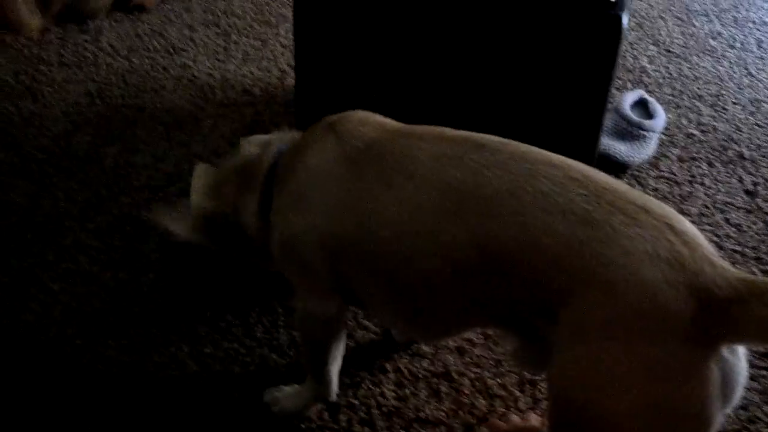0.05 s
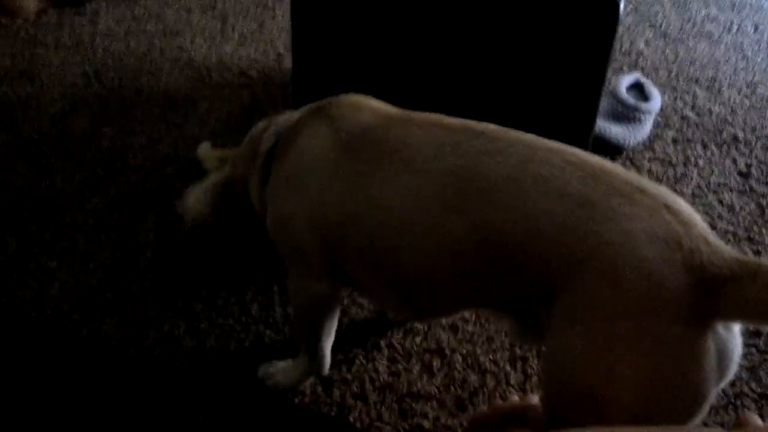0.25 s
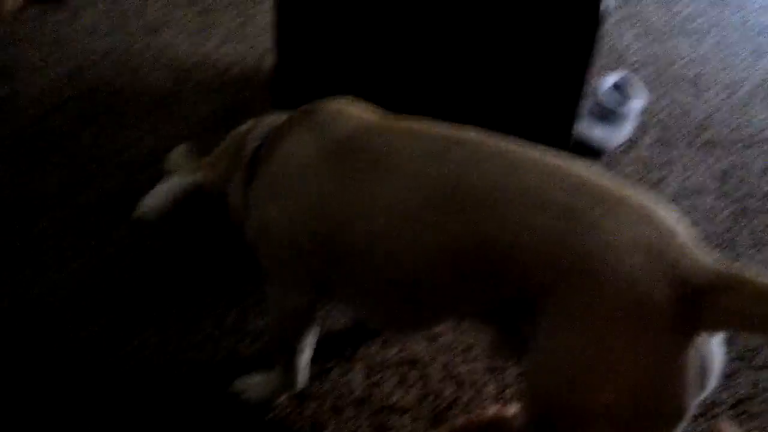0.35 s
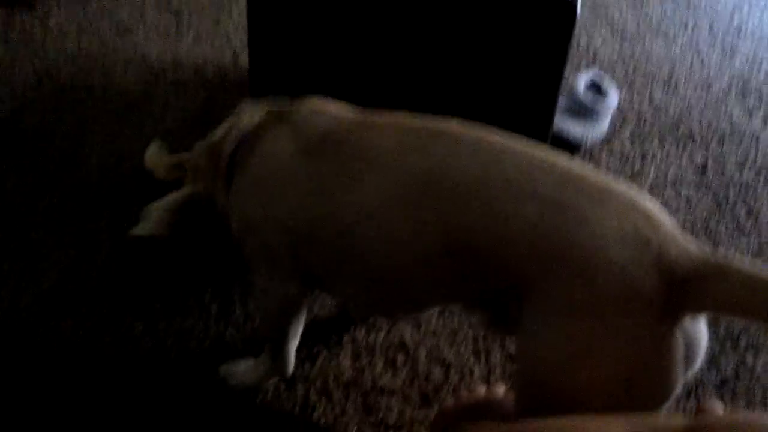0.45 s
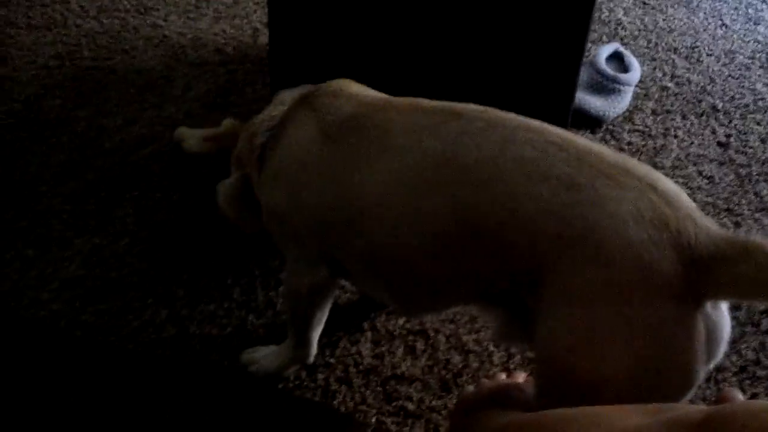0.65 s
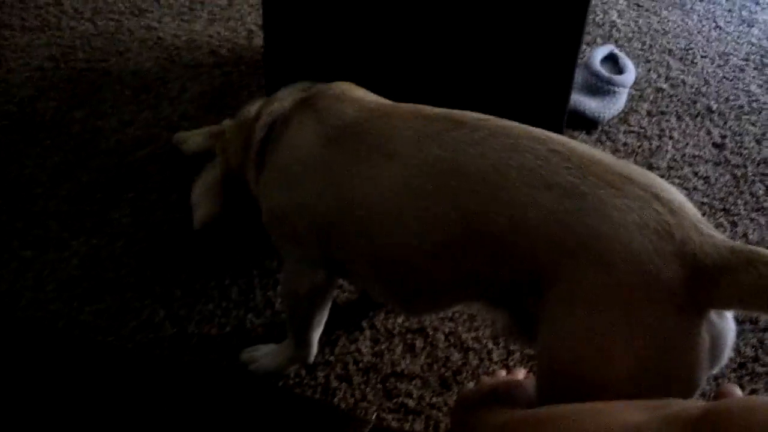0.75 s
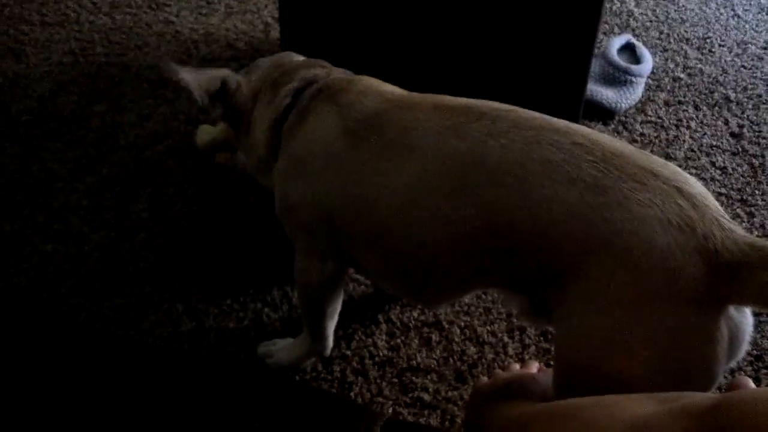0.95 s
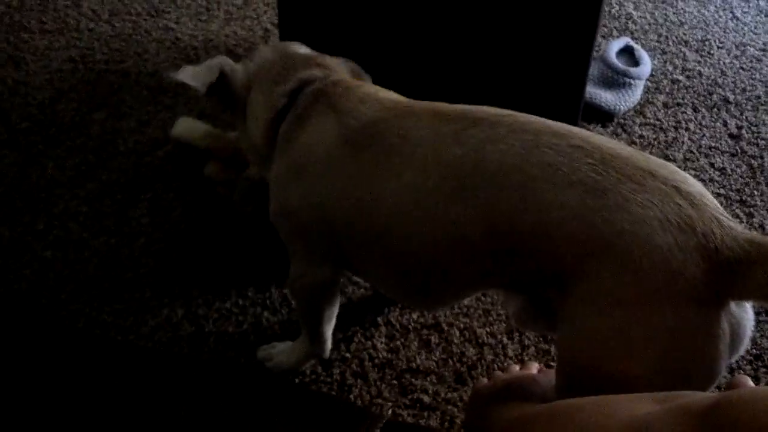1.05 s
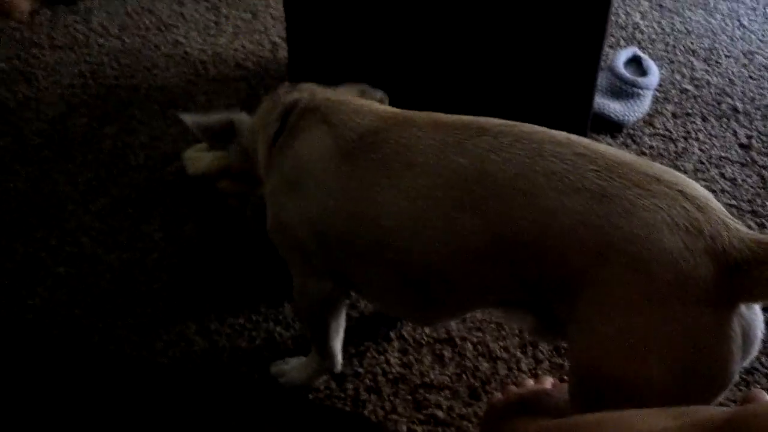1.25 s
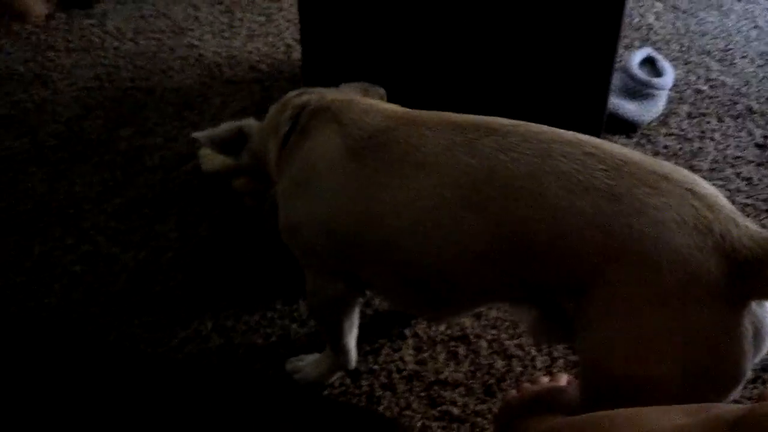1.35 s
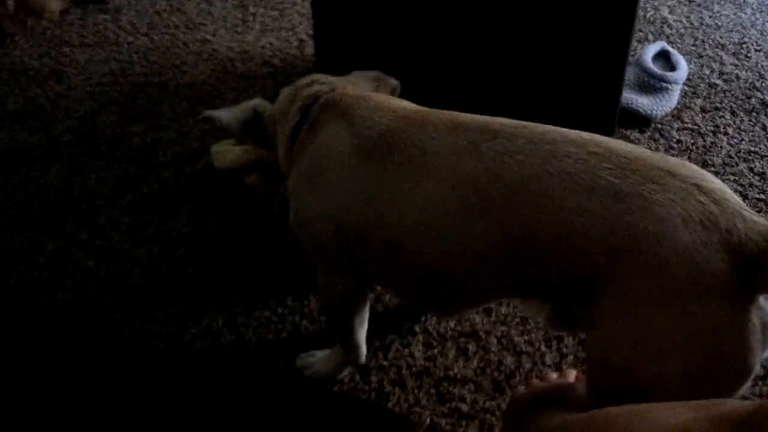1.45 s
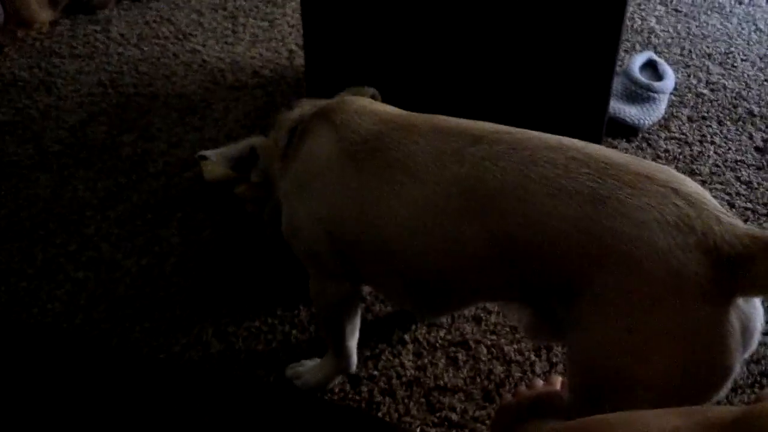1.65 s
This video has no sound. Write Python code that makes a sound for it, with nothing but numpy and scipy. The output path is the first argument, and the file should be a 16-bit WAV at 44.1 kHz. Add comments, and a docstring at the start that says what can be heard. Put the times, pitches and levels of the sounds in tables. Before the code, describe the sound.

Three short, piercing toy squeaks as a dog bites, over faint low room hum and hiss

```python
"""A dog bites a squeaky plush toy three times, left of two small microphones in a quiet carpeted room.
The squeaker's reed sings with the air pressure: gliding overtones and a hiss pulsed on every cycle.
Around it are gliding sine whistles, toneless hisses of leaking air and short ringing tooth ticks.
Echoes and a diffuse tail give the room, shaped noise and faint steady tones its background.
The recorder widens the stereo with delayed crossed copies and turns its gain down after loud sounds."""
import sys
import numpy as np
from scipy import signal
from scipy.fft import rfft, irfft
from scipy.io import wavfile
from scipy.ndimage import uniform_filter1d

SR = 44100
rng = np.random.default_rng(int(sys.argv[2]) if len(sys.argv) > 2 else 0)


def nominal_scale(level):
    """Amplitude ratio for a level in decibels (scalar or array-like)."""
    x = np.asarray(level, float) / 20
    return 10 ** x


def put_to_file(sound):
    """Save the sound as 16-bit audio at rate SR, in the file named by the first command-line argument."""
    columns = np.atleast_2d(sound).T  # one column per channel
    safe = np.clip(columns, -1, 1)
    whole_steps = np.round(safe * 32767)
    wavfile.write(sys.argv[1], SR, whole_steps.astype(np.int16))


N = 74970  # samples, 1.7 s

# Room tone and microphone hiss. Each row: frequency in Hz, relative level in dB per Hz.
FLOOR_COLOUR = [(40, -26.5), (70, -2), (120, 7), (180, 6.5), (300, -11), (600, -10), (1000, -23.5),
                (1330, -17.5), (2000, -24.5), (4000, -27.5), (8000, -39), (10500, -38.5), (13000, -37),
                (15000, -35.5)]
FLOOR_DB, FLOOR_FLICKER_DB = -51, 1
# How alike the floor and the room tail are at both microphones. Each row: frequency in Hz, likeness from 0 to 1.
MIC_LIKENESS = [(50, 0.88), (120, 1), (300, .75), (800, .6), (1500, .1), (4000, .02)]
# Faint steady tones in the room. Each row: frequency in Hz, middle level in dB at the left microphone.
HUM_TONES = [(120, -57), (180, -60), (595, -78.5), (1325, -76)]
# Teeth ticking on the toy. Each row: start in seconds, level in dB, ring frequency in Hz.
TOOTH_TICKS = [(0.116, -59.5, 6300), (0.127, -61.5, 5800)]
TICK_T60_S = .012
# Toneless air leaks, before the toy's colour. Each row: start in seconds, length in seconds, level in dB.
AIR_LEAKS = [(.185, .03, -71.5), (1.6, 0.041, -64.5)]
# Reed path, one list per squeak. Each row: time in seconds, pitch in Hz, level in dB before the toy's colour.
REED_SQUEAKS = [
    [(.2116, 854, -22), (.2132, 1344, -19.5), (.22, 1394, -29), (.232, 1418, -24.5), (.25, 1509, -22.5),
     (.265, 1582, -17.5), (.28, 1661, -29), (.292, 1676, -16), (.304, 1640, -26), (.316, 1532, -22.5),
     (.33, 1315, -26.5), (.35, 983, -39), (.36, 874, -41.5)],
    [(.6398, 1110, -40), (.6415, 1366, -22), (.653, 1482, -19.5), (.662, 1658, -14.5), (.671, 1838, -18.5),
     (.68, 1985, -8.5), (.684, 2168, -20.5), (.688, 2620, -8.5), (.692, 2740, -23), (.695, 3510, -33),
     (.697, 4285, -11.5), (.705, 4540, -12.5), (.709, 5430, -18.5), (.712, 5800, -41.5)],
    [(.8362, 4994, -53), (.838, 4512, -11.5), (.8405, 3567, -21), (.8435, 3181, -15), (.8455, 2233, -12),
     (.849, 1852, -16), (.855, 1589, -21.5), (.858, 1324, -24.5), (.863, 926, -34)],
]
# Slope of the overtones. One value per squeak: dB per octave.
OVERTONE_SLOPES = [-2, -3.5, -2]
OVERTONE_TWIST = .7  # radians; staggers the overtones so that a cycle is no sharp spike
# the hiss and the overtones above DULL_ABOVE_HZ start dull and come up as the reed settles
DULL_START_DB, DULL_ABOVE_HZ, SETTLE_S = 9.5, 7600, 0.032
REED_JITTER, REED_FLUTTER_DB, REED_HISS_DB = .003, 3, -20  # pitch share, level flutter, air under the tone
# Pure whistles, during the first squeak and after the second, one list per whistle.
# Each row: time in seconds, pitch in Hz, level in dB before the toy's colour.
WHISTLE_GLIDES = [
    [(.258, 1535, -40), (.27, 1772, -22), (.29, 1895, -23), (.303, 1707, -24), (.31, 1710, -44)],
    [(.71, 614, -46.5), (.725, 605, -35.5), (.76, 535, -40), (.81, 573, -49), (.83, 540, -52.5)],
]
# Colour of squeaker and plush. Each row: frequency in Hz, gain in dB.
TOY_COLOUR = [(500, -16), (900, -5.5), (1200, -7), (1700, -6.5), (2200, -4), (2700, -3.5), (3200, 0.5),
              (4500, -3), (5500, 0), (8000, -4.5), (9500, -6.5), (12000, -8), (14300, -7.5), (15300, -3.5)]
TUBE_HZ, TUBE_WIDTH_HZ, TUBE_DB = 6700, 1100, 6.5  # resonance of the squeaker's tube
# Right microphone against left, as the toy is on the left. Each row: frequency in Hz, gain in dB.
RIGHT_SHADOW = [(500, -6), (2200, 1), (3500, -7.5), (6000, -19), (12000, -16.5)]
RIGHT_LAG_S = .00009  # about 3 cm further for the sound to travel
# Strong echoes. Each row: delay in seconds, left level in dB, right level in dB.
ROOM_ECHOES = [(.006, -18.5, -12), (.011, -18.5, -6.5), (.021, -11, -17)]
# Decay of the room tail. Each row: frequency in Hz, time to fall 60 dB in seconds.
TAIL_T60 = [(500, .4), (1500, 0.39), (4000, .33), (8000, 0.38), (15000, .22)]
TAIL_DB, TAIL_BUILD_S = -8, .008
CROSS_SAMPLES, CROSS_SHARE = 16, 1  # delay and share of the opposite channel
GAIN_FROM_DB, GAIN_SHARE = -41, 0.48  # threshold, dB of cut per dB above it
GAIN_ATTACK_S, GAIN_RELEASE_DB_PER_S = 0.078, 22.5
TOP_HZ = 15750  # top of the reed's overtones and of the recorder


def rms_one(x):
    """Scales a signal to an rms of 1."""
    return x / np.sqrt(np.mean(x ** 2) + 1e-20)


def at_hz(points, hz):
    """Reads a table between its rows, along log frequency."""
    table = np.array(points)
    return np.interp(np.log(np.maximum(hz, 1)), np.log(table[:, 0]), table[:, 1])


def drift(rate):
    """Random wander of rms 1: white noise through two equal low-pass poles at rate in Hz."""
    r = np.exp(-2 * np.pi * rate / SR)
    wander = signal.lfilter([1], [1, -2 * r, r * r], rng.standard_normal(N + SR))
    return rms_one(wander[SR:])  # the first second is run-in


def bands(step):
    """Neighbouring noise bands, step octaves wide: centre in Hz and a pair of unrelated draws."""
    edges = 36 * 2 ** np.arange(0, 9.1, step)
    white = rng.standard_normal((2, 2, N))
    for k, (low, high) in enumerate(zip(edges, edges[1:])):
        sos = signal.butter(2, [low, high], "band", fs=SR, output="sos")
        yield np.sqrt(low * high), signal.sosfilt(sos, white[k % 2])


def paired(hz, noise):
    """Mixes a shared and an opposed noise to the likeness of the two microphones."""
    alike = np.clip(at_hz(MIC_LIKENESS, hz), 0, 1)
    shared = np.sqrt((1 + alike) / 2) * noise[0]
    opposed = np.sqrt((1 - alike) / 2) * noise[1]
    return shared + opposed * [[1], [-1]]


def floor():
    """Room tone and hiss from flickering noise bands, and hum from sines of wandering level."""
    t = np.arange(N) / SR
    tone = sum(paired(hz, noise) * nominal_scale(at_hz(FLOOR_COLOUR, hz) + FLOOR_FLICKER_DB * drift(12))
               for hz, noise in bands(1 / 3))
    hum = sum(nominal_scale(db + 5.4 * drift(8)) * np.sin(2 * np.pi * hz * t) for hz, db in HUM_TONES)
    return nominal_scale(FLOOR_DB) * rms_one(tone) + hum * [[1], [.7]]


def ticks():
    """Teeth on the toy set off short bright rings: sines that decay exponentially."""
    t = np.arange(N) / SR
    out = np.zeros(N)
    for s, db, hz in TOOTH_TICKS:
        decay = nominal_scale(db - 60 * np.abs(t - s) / TICK_T60_S) * (t > s)
        out += decay * np.sin(2 * np.pi * hz * (t - s))
    return out


def leaks():
    """Air slipping through the squeaker without a tone: white hiss that swells and fades."""
    t = np.arange(N) / SR
    swell = sum(nominal_scale(db) * np.sin(np.pi * np.clip((t - s) / length, 0, 1)) ** .5
                for s, length, db in AIR_LEAKS)
    return swell * rng.standard_normal(N)


def squeaks():
    """The reed chops the air: a stack of overtones and a hiss pulsed on every cycle."""
    out, t = np.zeros(N), np.arange(N) / SR
    jitter, flutter, hiss = drift(150), drift(90), rng.standard_normal(N)
    k = np.arange(1, 18)[:, None]  # overtone numbers
    for rows, slope_db in zip(REED_SQUEAKS, OVERTONE_SLOPES):
        s, hz, db = np.transpose(rows)
        on = (t >= s[0]) & (t < s[-1])
        pitch = np.interp(t[on], s, hz) * (1 + REED_JITTER * jitter[on])
        phase = 2 * np.pi * np.cumsum(pitch) / SR
        dull_db = DULL_START_DB * np.exp(-(t[on] - s[0]) / SETTLE_S)
        overtone_db = slope_db * np.log2(k) - dull_db * (k * pitch > DULL_ABOVE_HZ)
        overtones = nominal_scale(overtone_db) * np.sin(k * phase + OVERTONE_TWIST * k * k)
        tone = (overtones * (k * pitch < TOP_HZ)).sum(0)
        air = nominal_scale(REED_HISS_DB - dull_db) * hiss[on] * (1 + np.cos(phase))
        out[on] = (tone + air) * nominal_scale(np.interp(t[on], s, db) + REED_FLUTTER_DB * flutter[on])
    return out


def whistles():
    """Gliding sines without overtones, their phase summed from the pitch."""
    out, t = np.zeros(N), np.arange(N) / SR
    for rows in WHISTLE_GLIDES:
        s, hz, db = np.transpose(rows)
        on = (t >= s[0]) & (t < s[-1])
        phase = 2 * np.pi * np.cumsum(np.interp(t[on], s, hz)) / SR
        out[on] = nominal_scale(np.interp(t[on], s, db)) * np.sin(phase)
    return out


def resonance(x, hz, width_hz):
    """A ringing air column as a two-pole band-pass, with a gain of about 1 at its peak."""
    r = np.exp(-np.pi * width_hz / SR)
    poles = [1, -2 * r * np.cos(2 * np.pi * hz / SR), r * r]
    return signal.lfilter(np.array([1, 0, -1]) * (1 - r * r) / 2, poles, x)


def coloured(x, points, lag_s=0):
    """Gain by frequency with the phase that lets nothing sound early (minimum phase), and a lag."""
    hz = np.arange(N // 2 + 1) * SR / N
    cepstrum = irfft(np.log(nominal_scale(at_hz(points, hz))), N)
    cepstrum[1:N // 2] *= 2  # fold the late half onto the early half
    cepstrum[N // 2 + 1:] = 0
    return irfft(rfft(x) * np.exp(rfft(cepstrum) - 2j * np.pi * hz * lag_s), N)


def room(x):
    """A few strong echoes and a diffuse tail that builds up, then dies band by band."""
    t = np.arange(SR // 2) / SR
    tail = sum(paired(hz, noise)[:, :len(t)] * nominal_scale(-60 * t / at_hz(TAIL_T60, hz))
               for hz, noise in bands(1) if hz > 300)
    tail = tail * (1 - np.exp(-t / TAIL_BUILD_S))
    tail = nominal_scale(TAIL_DB) * tail / np.sqrt((tail ** 2).sum(1, keepdims=True))
    echoes = np.zeros_like(tail)
    for delay, left_db, right_db in ROOM_ECHOES:
        echoes[:, int(delay * SR)] = nominal_scale([left_db, right_db])
    return signal.fftconvolve(x[None], tail + echoes, axes=1)[:, :N]


def scene():
    """The toy direct at the left and right microphones, its echoes and tail, and the room's floor."""
    air = squeaks() + whistles() + leaks()
    tube = nominal_scale(TUBE_DB) * resonance(air, TUBE_HZ, TUBE_WIDTH_HZ)
    toy = coloured(air + tube, TOY_COLOUR) + ticks()
    direct = np.array([toy, coloured(toy, RIGHT_SHADOW, RIGHT_LAG_S)])
    return direct + room(toy) + floor()


def band_limit(x):
    """A steep low-pass at the top of the band."""
    return signal.sosfilt(signal.butter(12, 16610, fs=SR, output="sos"), x)


def record(dry):
    """The recorder: gain that drops after loud sounds, stereo widening and a steep top cut."""
    fall = GAIN_RELEASE_DB_PER_S * np.arange(N) / SR
    level_db = 10 * np.log10(uniform_filter1d((dry ** 2).mean(0), size=441) + 1e-12)  # over 10 ms
    held_db = np.maximum.accumulate(level_db + fall) - fall  # peaks that sink at the release rate
    over_db = np.maximum(held_db - GAIN_FROM_DB, 0)
    r = np.exp(-1 / (GAIN_ATTACK_S * SR))
    levelled = dry * nominal_scale(-GAIN_SHARE * signal.lfilter([1 - r], [1, -r], over_db))
    crossed = np.pad(levelled[::-1], ((0, 0), (CROSS_SAMPLES, 0)))[:, :N]
    wide = levelled - CROSS_SHARE * crossed
    top_cut = signal.ellip(10, 1, 50, TOP_HZ, fs=SR, output="sos")
    return band_limit(signal.sosfilt(top_cut, wide))


dry = scene()
out = record(dry)
put_to_file(out)
```